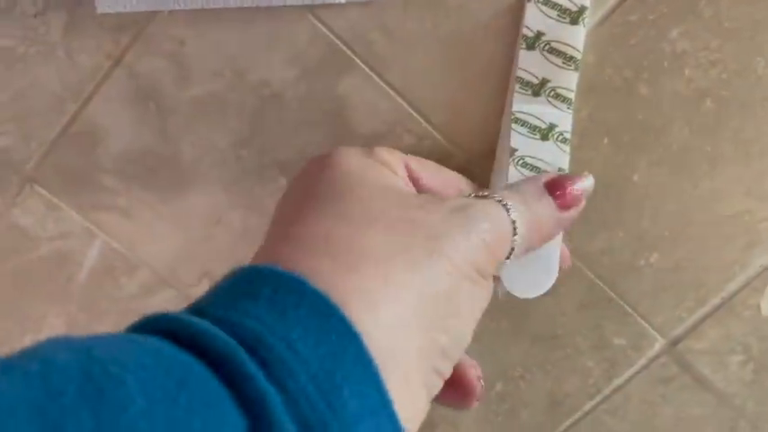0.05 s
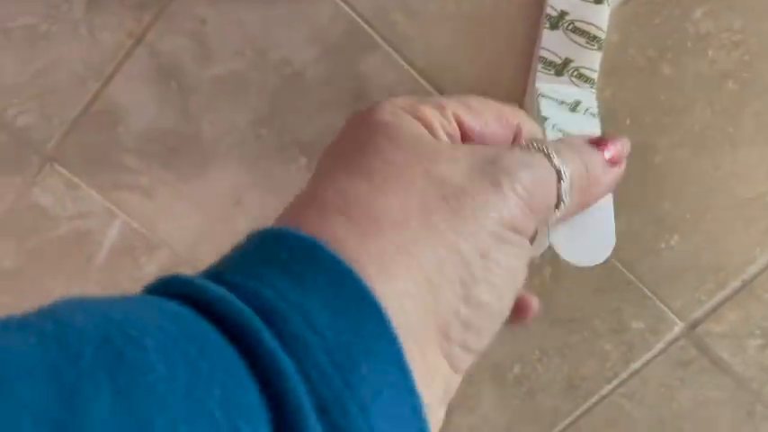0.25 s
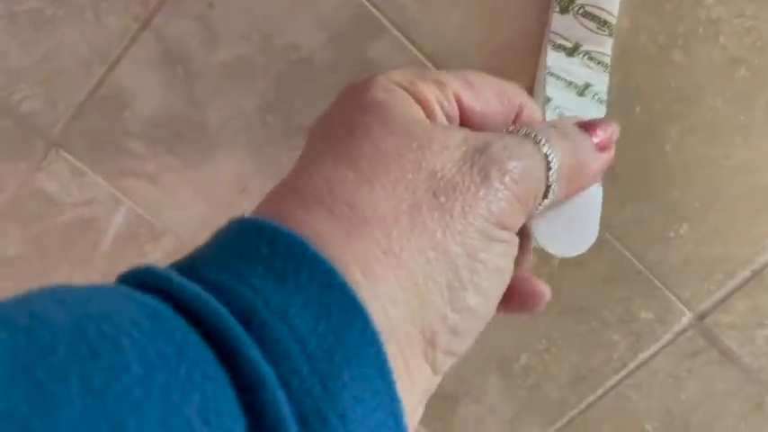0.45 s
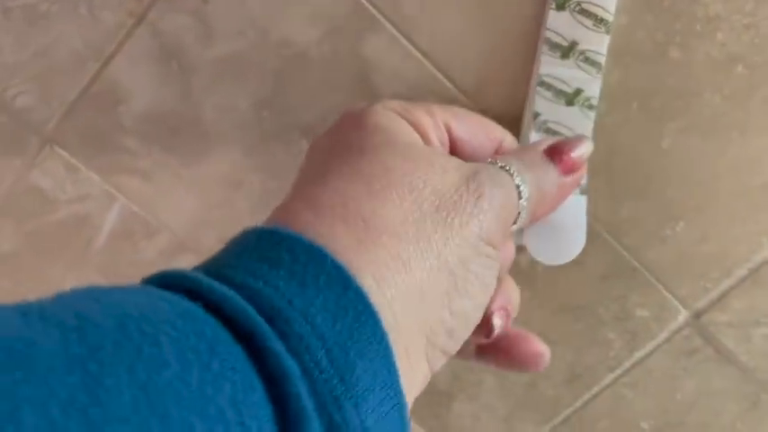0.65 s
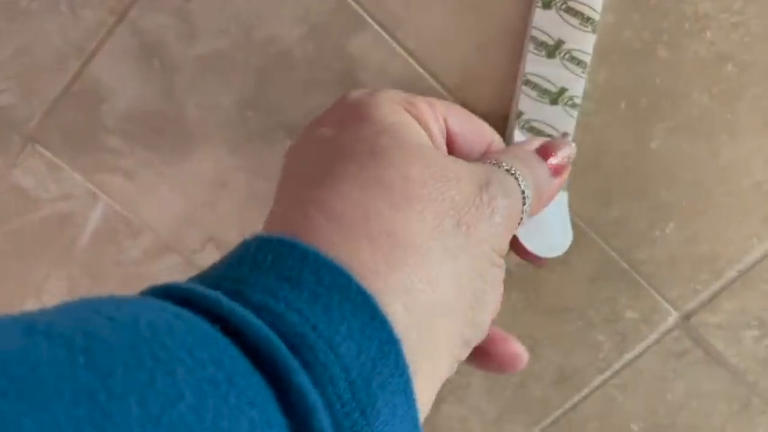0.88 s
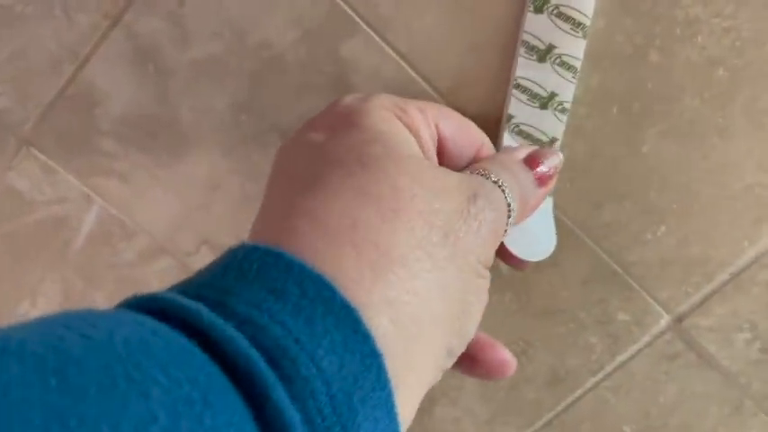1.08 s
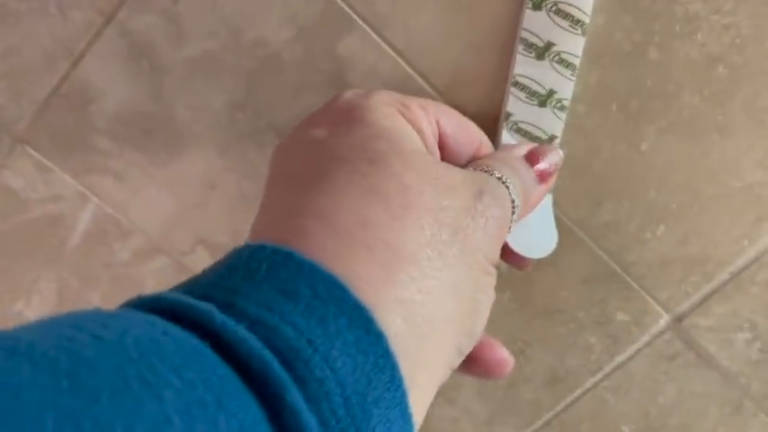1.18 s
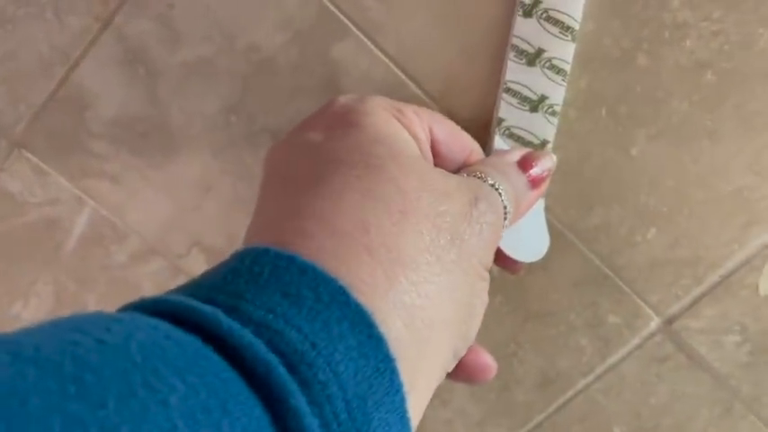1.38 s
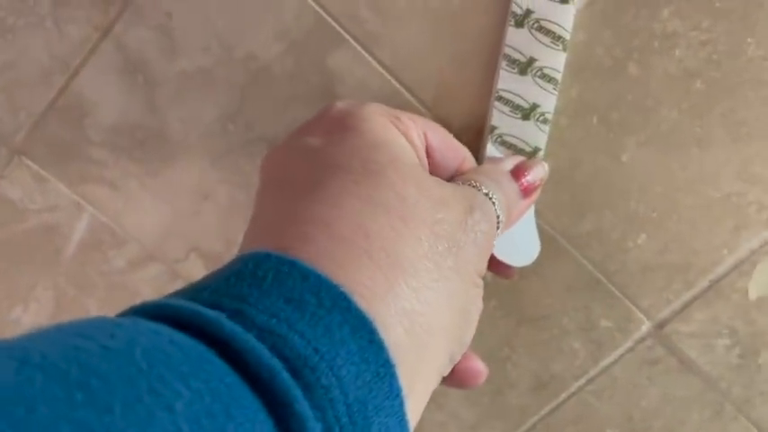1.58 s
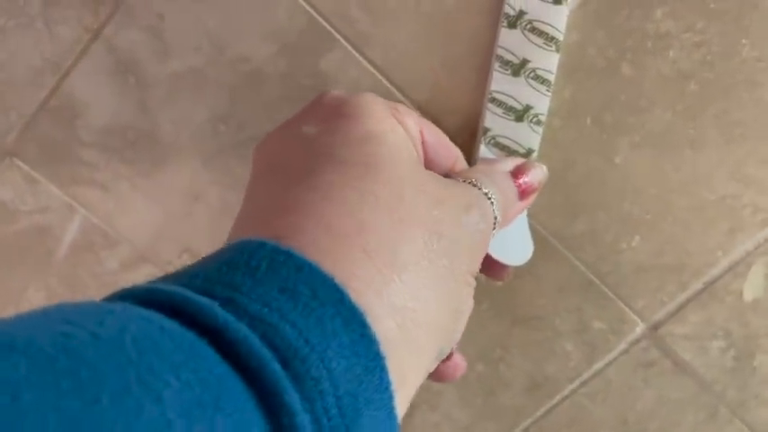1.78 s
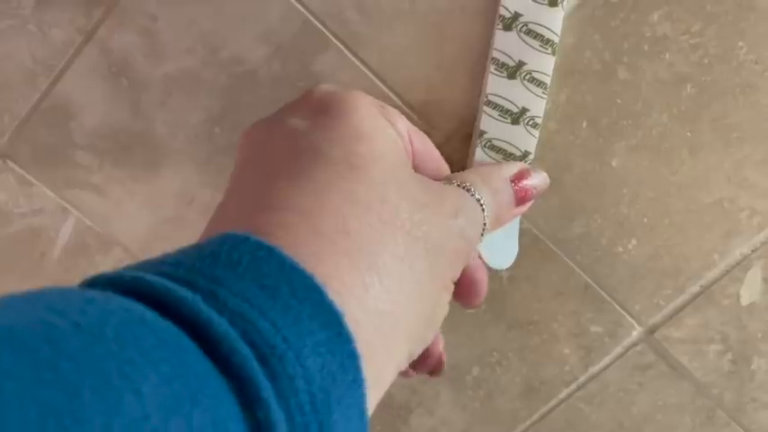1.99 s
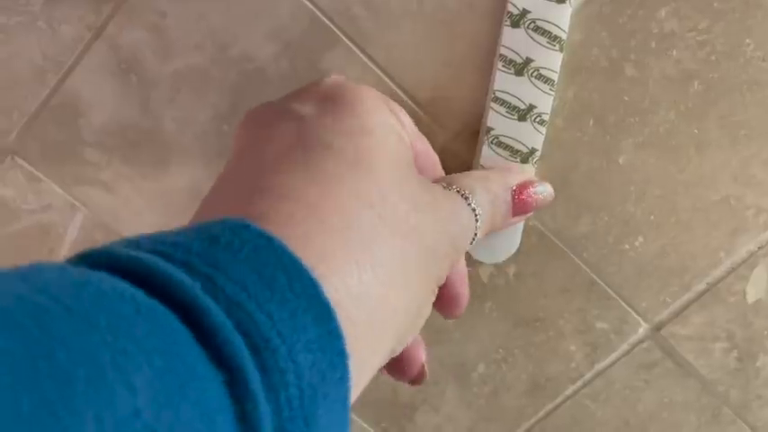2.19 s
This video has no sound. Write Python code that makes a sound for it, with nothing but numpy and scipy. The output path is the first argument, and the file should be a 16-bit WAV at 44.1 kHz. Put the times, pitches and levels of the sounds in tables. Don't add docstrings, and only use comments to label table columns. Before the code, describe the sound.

Sharp plastic crackling as fingers press interlocking strips together, a pause, then a shorter second snap.

```python
import sys
import numpy as np
from scipy import signal
from scipy.fft import rfft, irfft, next_fast_len
from scipy.io import wavfile

SR = 44100
rng = np.random.default_rng(int(sys.argv[2]) if len(sys.argv) > 2 else 0)


def makeup_ratio(level_db):
    decades = np.asarray(level_db, float) / 20
    return 10 ** decades


def file_out(sig):
    cols = np.atleast_2d(sig).T
    lim = np.clip(cols, -1, 1)
    pcm = np.round(lim * 32767).astype(np.int16)
    wavfile.write(sys.argv[1], SR, pcm)


N = 99225

# hz, likeness (1 same, -1 opposed)
LIKENESS = [(60, 0.94), (240, 0.8), (700, -0.49), (3000, 0.11), (6500, 0.98), (7600, -2), (8200, -1.9),
            (9700, -1.3), (10600, -0.8), (12000, -0.023)]


def rms_one(x):
    return x / np.sqrt(np.mean(x ** 2) + 1e-20)


def in_time(rows):
    time_s, level_db = np.transpose(rows)
    return makeup_ratio(np.interp(np.arange(N) / SR, time_s, level_db, -150, -150))


def at_hz(points, hz):
    p = np.array(points, float)
    return np.interp(np.log(hz + 1), np.log(p[:, 0] + 1), p[:, 1])


def likeness_at(hz):
    return np.clip(at_hz(LIKENESS, hz), -1, 1)


def colour(x, points):
    cepstrum = irfft(np.log(makeup_ratio(at_hz(points, np.fft.rfftfreq(2048, 1 / SR)))))
    cepstrum[1:1024] *= 2
    cepstrum[1025:] = 0
    h = irfft(np.exp(rfft(cepstrum)))
    return signal.fftconvolve(x, h / np.linalg.norm(h))[:N]


def peak(x, hz, width_hz):
    r = np.exp(-np.pi * width_hz / SR)
    zeros = np.array([1, 0, -1]) * (1 - r * r) / 2
    poles = [1, -2 * r * np.cos(2 * np.pi * hz / SR), r * r]
    return signal.lfilter(zeros, poles, x + 1e-18)


def peak_twice(x, hz, width_hz):
    return peak(peak(x, hz, width_hz), hz, width_hz)


def drift(rate_hz):
    r = np.exp(-80 * np.pi * rate_hz / SR)
    slow = signal.lfilter([1], [1, -2 * r, r * r], rng.standard_normal(N // 40 + 1002))[1000:]
    return np.interp(np.arange(N) / 40, np.arange(len(slow)), rms_one(slow))


def grains(per_s, spread_db):
    size = makeup_ratio(spread_db * np.minimum(rng.exponential(1, N), 4)) * rng.choice([-1, 1], N)
    return rms_one(size * (rng.random(N) < per_s / SR))


def wash(spectrum, patchy_db):
    out = 0
    edges_hz = 20 * 2 ** np.arange(0, 10.1, 1 / 3)
    white = rng.standard_normal((2, 2, N))
    flicker = [drift(14) for _ in range(12)]
    for k, (low_hz, high_hz) in enumerate(zip(edges_hz, edges_hz[1:])):
        band = signal.butter(2, [low_hz, high_hz], "band", fs=SR, output="sos")
        mid, side = signal.sosfilt(band, white[k % 2])
        hz = np.sqrt(low_hz * high_hz)
        alike = likeness_at(hz)
        stereo = np.sqrt(1 + alike) * mid + np.sqrt(1 - alike) * side * [[1], [-1]]
        out = out + makeup_ratio(at_hz(spectrum, hz) + patchy_db * flicker[k // 3]) * stereo
    return rms_one(out)


def strips():
    slips = grains(14000, 2.5)
    snaps = snap_trains(slips)
    grit = pressed_grit()
    return bright_stems(snaps, grit) + backing_strip(snaps, grit) + loose_end(slips)


def snap_trains(slips):
    # start_s, peak_db, after_slips_db, strip_body_db, thin_top_db
    snap_rows = [(0.0298, -39.5, -8, 0.5, 10), (0.0877, -58, -4.5, -13, 17), (0.152, -25.5, -10.5, 1.5, 5),
                 (0.1575, -28.5, -17, 8.5, 17), (0.191, -30, -11.5, 3, -1), (0.2092, -31, -5.5, 1.5, 5),
                 (.243, -35, -12.5, -6.5, 7), (0.2454, -25.5, -12, -5, 15), (.2557, -17.5, -11.5, 2, 13),
                 (0.2644, -17, -9.5, 2.5, 10), (.2712, -27, -14.5, -9.5, -1.5),
                 (0.2719, -12.5, -7.5, -5, 11), (0.2749, -17.5, -8, 5.5, 1.5), (0.2839, -17.5, -6, 9, 0),
                 (.289, -6, -11.5, 2, 3), (.304, -31.5, -8.5, 1, 2), (0.314, -27, -12, 0, -4),
                 (0.3144, -10.5, -12, 4.5, 2), (0.327, -10, -15.5, -2.5, -3), (.338, -13, -11.5, -3.5, 8),
                 (0.3411, -7, -21, 0, 5), (0.3704, -4.5, -12.5, -2.5, 3.5), (0.4249, -21, -9.5, 9, -7),
                 (0.4363, -13.5, -13, 5, -10), (.4371, -4, -19, -1.5, -17), (0.458, -17, -15.5, -7.5, -12),
                 (0.5023, -4, -16, 4.5, -28), (0.7835, -41, -11.5, -2.5, 5), (1.646, -21, -12.5, 4, 14),
                 (1.812, -56.5, -3, -1.5, 7), (1.8605, -24.5, -11, 8.5, 8), (1.8624, -27.5, -17.5, 6, 3),
                 (1.8775, -3, -9.5, 2.5, -1), (1.9172, -29.5, -13, 10, 12), (1.929, -27.5, -4.5, 6.5, 2),
                 (1.9398, -26.5, -16, 4.5, -3), (2.0055, -43, -8.5, 6, 9), (2.0389, -49, -3.5, 2, 0),
                 (2.077, -43, -1.5, 7, 2), (2.0823, -37.5, -16, 5.5, -2)]
    # delay_s, level_db
    bounce_rows = [(.0011, -15.5), (.0022, -10)]
    crack_db, body_crack_db = 7, -1.5
    lead_db, lead_t60_s = -17, 0.012
    fast_t60_s, slow_t60_s, slow_db = 0.023, 0.059, -11

    thin, thick, top = np.zeros((3, N))
    step = np.arange(-1000, 5000)
    age_s = np.abs(step) / SR
    fall = makeup_ratio(-60 * age_s / fast_t60_s) + makeup_ratio(slow_db - 60 * age_s / slow_t60_s)
    shape = np.where(step > 0, fall, makeup_ratio(lead_db - 60 * age_s / lead_t60_s))
    for start_s, db, after_db, body_db, top_db in snap_rows:
        at = int(start_s * SR) + step
        shower = makeup_ratio(after_db - 3) * shape * slips[at]
        crack = np.where(step == 0, makeup_ratio(crack_db), shower)
        thin[at] += makeup_ratio(db) * crack
        top[at] += makeup_ratio(db + top_db) * crack
        thick[at] += makeup_ratio(db + body_db) * np.where(step == 0, makeup_ratio(body_crack_db), shower)
    thin = thin + sum(makeup_ratio(db) * np.roll(thin, int(delay_s * SR)) for delay_s, db in bounce_rows)
    return thin, thick, top


def pressed_grit():
    # time_s, level_db
    pressure = [(0, -72), (.075, -99), (.09, -89), (.13, -72), (.25, -76.5), (.4, -71), (.56, -71.5),
                (.8, -87.5), (.98, -74.5), (1.2, -90), (1.66, -99), (1.79, -81.5), (1.82, -74), (1.95, -63),
                (2.0, -76), (2.035, -75), (2.042, -61.5), (2.25, -106.5)]
    grit = makeup_ratio(3 + 2.2 * drift(51)) * in_time(pressure) * grains(1500, 2.2)
    return signal.sosfilt(signal.butter(4, 14740, fs=SR, output="sos"), grit)


def bright_stems(snaps, grit):
    # hz, level_db_per_hz
    snap_colour = [(700, -47), (2500, -36), (5500, -14.5), (6600, -10.5), (8400, 2), (11000, -6),
                   (14500, -10), (16500, -15.5)]
    # hz, level_db_per_hz
    grit_colour = [(1000, -32), (3000, -21), (6500, -7.5), (7600, -13.5), (9600, -16.5), (11000, -2),
                   (14000, -2), (16500, -7)]
    # hz, width_hz, level_db
    stem_modes = [(4190, 200, 11.5), (4910, 200, 6.5), (6554, 160, 7), (6970, 170, 4.5), (7355, 320, -2),
                  (9290, 250, 2.5), (10360, 220, 4), (11335, 280, 0.5), (12600, 250, 0.5), (13700, 250, 1)]
    thin, _, top = snaps
    bright = colour(thin, snap_colour) + colour(grit, grit_colour)
    ring = sum(makeup_ratio(db) * peak(bright, hz, width_hz) for hz, width_hz, db in stem_modes)
    return makeup_ratio(-3.5) * (bright + ring) + peak_twice(top, hz=14060, width_hz=1400)


def backing_strip(snaps, grit):
    # hz, width_hz, level_db
    strip_modes = [(1076, 41, -11.5), (1463, 560, -21), (2110, 250, -5), (2650, 2500, -8), (4000, 300, -30),
                   (764, 400, -25.5)]
    # time_s, level_db
    grip = [(0, 7), (.24, 18), (.27, 12.5), (.4, 17), (.45, -2), (1.6, -17.5), (1.9, -16.5), (2.25, 8)]
    drive = snaps[1] + makeup_ratio(11.5) * grit
    modes = [makeup_ratio(db) * peak(drive, hz, width_hz) * (-1) ** k
             for k, (hz, width_hz, db) in enumerate(strip_modes)]
    return in_time(grip) * modes[0] + sum(modes[1:])


def loose_end(slips):
    # start_s, peak_db, pitch_hz
    ring_rows = [(0.156, -44.5, 4600), (0.192, -41.5, 4550), (.209, -55, 2380), (.256, -31.5, 4130),
                 (0.2652, -34, 2500), (0.2776, -33.5, 2350), (0.2882, -22.5, 4100), (0.3158, -29, 2450),
                 (.3289, -33.5, 2700), (.3407, -24, 1474), (0.3702, -25.5, 4000), (0.4265, -34.5, 2412),
                 (.4365, -32, 4000), (.4582, -45.5, 4293), (0.5019, -22, 2097), (1.6461, -36.5, 2490),
                 (1.8622, -36, 2910), (1.8773, -18, 3250), (1.879, -23, 6040), (1.926, -44, 1940),
                 (1.929, -32.5, 3560), (2.039, -54, 1180), (2.0793, -31, 1800), (2.0797, -38.5, 3380),
                 (2.0954, -55, 3610)]
    gain_db, t60_s, sharpness = 6.5, 0.04, 11
    partner_ratio, partner_db = 2.2, -2.5
    out, step = np.zeros(N), np.arange(3000)
    for start_s, db, hz in ring_rows:
        at = int(start_s * SR) + step
        shake = slips[at] * makeup_ratio(db + gain_db - 60 * step / SR / t60_s)
        upper_hz = hz * partner_ratio
        out[at] += peak(shake, hz, hz / sharpness)
        out[at] += makeup_ratio(partner_db) * peak(shake, upper_hz, upper_hz / sharpness)
    return out


def hand():
    # start_s, level_db, brightness_hz
    knock_rows = [
        (0.231, -26.5, 420),
        (.255, -25.5, 200),
        (0.298, -29, 202),
        (0.357, -32, 156),
        (1.585, -49, 540),
        (1.877, -40, 520),
        (1.94, -39.5, 123),
        (2.042, -42, 203),
        (2.075, -39, 207),
    ]
    # hz, level_db, t60_s
    body_modes = [(65, -14, 0.57), (77.8, -2.5, 0.21), (162, 0, 0.081), (201.3, 3.5, 0.064), (282.5, 0, .1),
                  (377, 1, 0.075), (579, -11, 0.068), (710, -12.5, 0.12), (1165, -20, 0.029)]
    out = np.zeros(N)
    chances_db = rng.normal(0, 2.7, (len(knock_rows), len(body_modes)))
    for (start_s, db, cut_hz), chance_db in zip(knock_rows, chances_db):
        age_s = np.maximum(np.arange(N) / SR - start_s, 0)
        onset = 1 - np.exp(-age_s / 0.013)
        for (hz, mode_db, t60_s), own_db in zip(body_modes, chance_db):
            level = makeup_ratio(db + mode_db + own_db - 60 * age_s / t60_s) / (1 + (hz / cut_hz) ** 2)
            out += level * np.sin(2 * np.pi * hz * age_s) * onset
    return out


def scuffs():
    # start_s, length_s, level_db, top_hz
    scuff_rows = [
        (1.584, 0.0049, -65.5, 1270),
        (1.872, 0.07, -54, 3300),
        (2.035, 0.04, -64, 2720),
        (2.077, 0.0031, -53, 4380),
        (2.119, 0.036, -61, 2876),
        (2.127, 0.032, -59.5, 2720),
        (2.171, 0.052, -77, 2490),
    ]
    low_hz, t60_s, attack_s = 690, 0.077, 0.0026
    t, out = np.arange(N) / SR, np.zeros(N)
    noise = grains(4600, 1.45) * makeup_ratio(3.56 * drift(60))
    for start_s, length_s, db, top_hz in scuff_rows:
        band = signal.butter(3, [low_hz, top_hz], "band", fs=SR, output="sos")
        dull = rms_one(signal.sosfilt(band, noise))
        attack = np.clip((t - start_s) / attack_s, 0, 1)
        out += dull * attack * makeup_ratio(db - 60 * np.maximum(t - start_s - length_s, 0) / t60_s)
    return out


def rubbing():
    # time_s, level_db
    rub_curve = [(0.0, -99), (0.2, -73.5), (0.24, -51), (0.34, -49.5), (0.39, -58), (0.45, -56),
                 (0.54, -53), (0.73, -61), (0.96, -66), (1.11, -63.5), (1.26, -82.5), (1.37, -64.5),
                 (1.66, -100), (1.91, -68), (2.03, -81), (2.16, -64), (2.25, -84)]
    # hz, level_db_per_hz
    rub_colour = [(300, -3), (600, 0), (1100, -2), (1500, -8), (1900, -17), (3000, -21), (7000, -23),
                  (16000, -45)]
    return in_time(rub_curve) * wash(rub_colour, patchy_db=4.0)


def ports(x):
    # hz, left_lead_rad
    port_phase = [(1000, 1.05), (3300, 1.5), (4600, 1.4), (5900, -0.95), (7600, -2.5), (10000, -4),
                  (12200, -5.5), (17000, -6.5)]
    # hz, left_minus_right_db
    port_tilt = [(100, 2.5), (1000, -0.5), (4500, 3.5), (7000, 4.5), (8600, 3.5), (10500, -2), (16000, 1)]
    size = next_fast_len(N + 4096)
    hz = np.fft.rfftfreq(size, 1 / SR)
    half = makeup_ratio(at_hz(port_tilt, hz) / 2) * np.exp(0.5j * at_hz(port_phase, hz))
    return irfft(rfft(x, size) * np.array([half, 1 / half]), size)[:, :N]


def room(x):
    t60_s, wall_cut_hz = 0.34, 5100
    size = next_fast_len(N + SR)
    w = np.exp(-2j * np.pi * np.fft.rfftfreq(size))
    dull = np.exp(-2 * np.pi * wall_cut_hz / SR)
    out = np.zeros((2, len(w)), complex)
    lags = (rng.uniform(0.0066, 0.046, 16) * SR).astype(int)
    for k, lag in enumerate(lags):
        wall = makeup_ratio(-60 * lag / SR / t60_s) * (1 - dull) / (1 - dull * w)
        loop = wall * np.exp(lag * np.log(w))
        out[k % 2] += (-1) ** (k // 2) * loop / (1 - loop)
    alike = likeness_at(np.fft.rfftfreq(size, 1 / SR))
    mid, side = irfft(out * np.sqrt([1 + alike, 1 - alike]) * rfft(x, size), size)[:, :N]
    return mid + side * [[1], [-1]]


def background():
    # hz, level_db
    hum_colour = [(25, -23.5), (60, 5.5), (90, -3), (220, -7.5), (400, -17.5), (560, -30), (2000, -40),
                  (16000, -50)]
    # time_s, level_db
    whine_curve = [(0, -90), (.7, -86), (1.2, -97.5), (1.45, -83), (1.7, -79), (2.25, -75.5)]
    hum_db, motor_db, whine_hz = -59, -73, 13797
    mid, side = [rms_one(peak_twice(noise, hz=411, width_hz=16)) for noise in rng.standard_normal((2, N))]
    motor = mid + 1.2 * side * [[1], [-1]]
    whine = np.sin(2 * np.pi * whine_hz * np.arange(N) / SR + 0.11 * drift(17))
    rumble = wash(hum_colour, patchy_db=3.0)
    return makeup_ratio(hum_db) * rumble + makeup_ratio(motor_db) * motor + in_time(whine_curve) * whine


def scene():
    close = strips() + scuffs()
    knocks = hand() * makeup_ratio([[1.2], [-1.2]])
    return ports(close) + knocks + makeup_ratio(-26) * room(close) + rubbing() + background()


def band_limit(x):
    return signal.sosfilt(signal.butter(12, 17020, fs=SR, output="sos"), x)


def record(dry):
    ceiling, top_hz, low_cut_hz = 0.9, 16500, 52
    dry = dry / (1 + (dry / ceiling) ** 6) ** (1 / 6)
    cut = signal.sosfilt(signal.cheby2(12, 75, top_hz * 1.04, fs=SR, output="sos"), dry)
    cut = signal.sosfilt(signal.butter(2, low_cut_hz, "high", fs=SR, output="sos"), cut)
    return band_limit(cut)


dry = scene()
out = record(dry)
file_out(out)
```